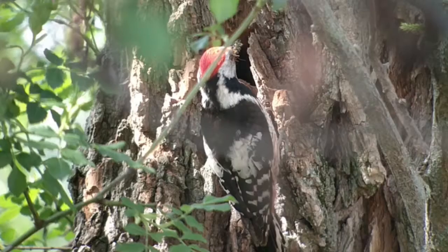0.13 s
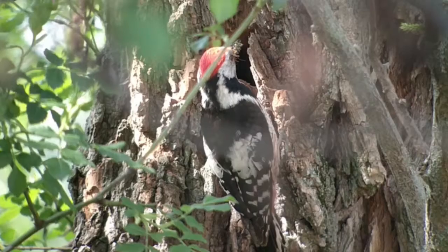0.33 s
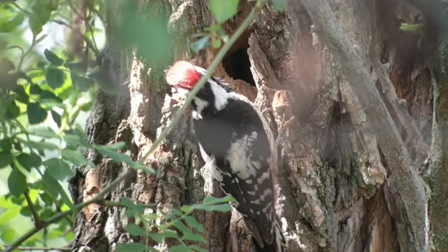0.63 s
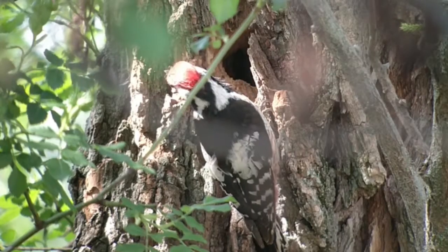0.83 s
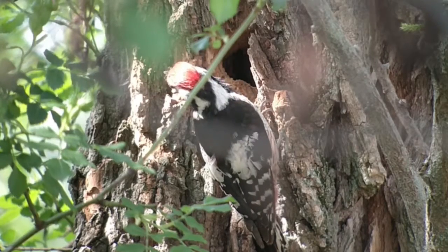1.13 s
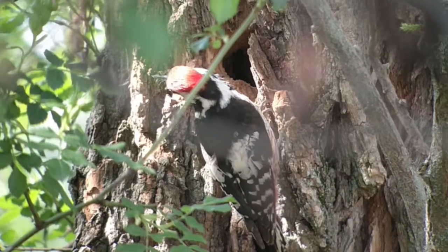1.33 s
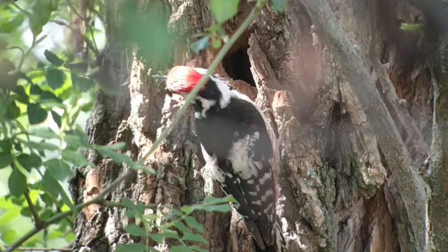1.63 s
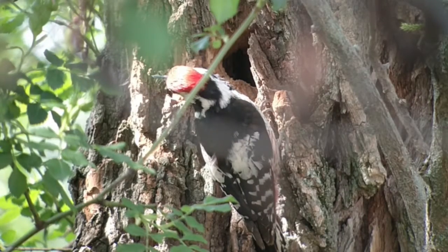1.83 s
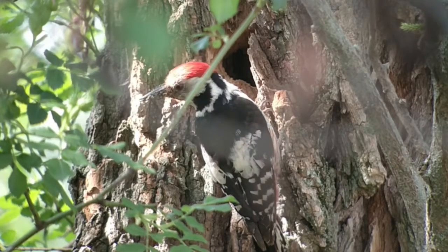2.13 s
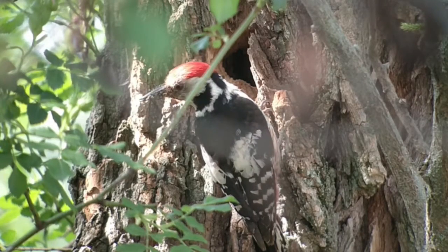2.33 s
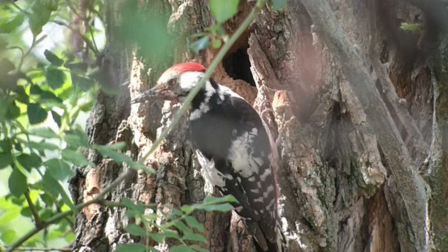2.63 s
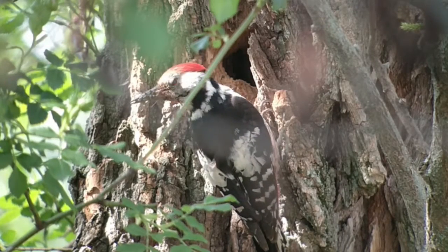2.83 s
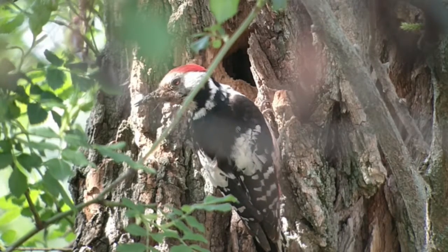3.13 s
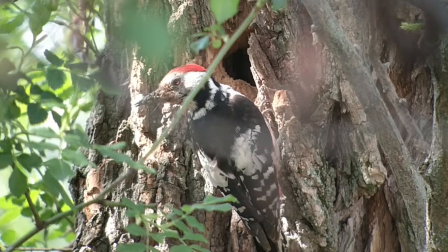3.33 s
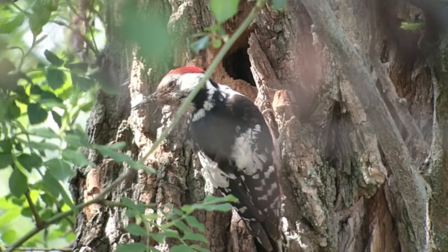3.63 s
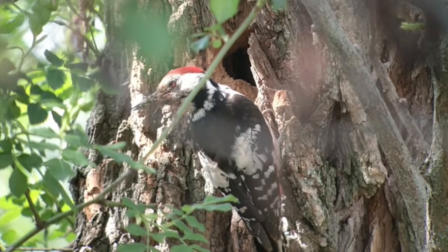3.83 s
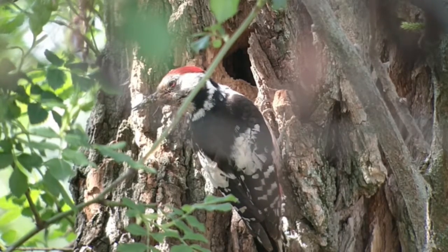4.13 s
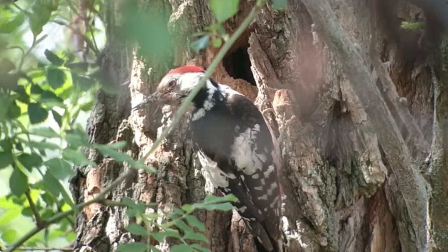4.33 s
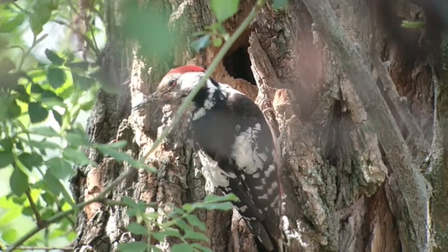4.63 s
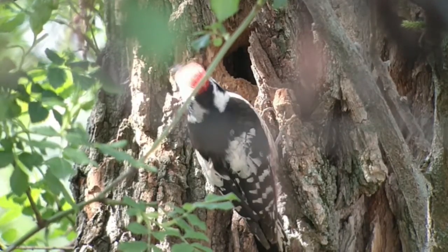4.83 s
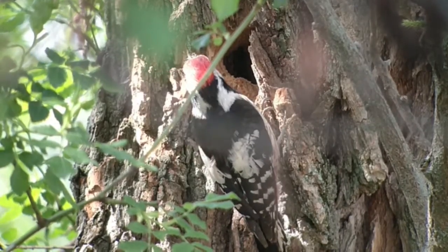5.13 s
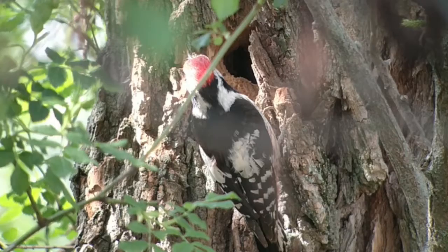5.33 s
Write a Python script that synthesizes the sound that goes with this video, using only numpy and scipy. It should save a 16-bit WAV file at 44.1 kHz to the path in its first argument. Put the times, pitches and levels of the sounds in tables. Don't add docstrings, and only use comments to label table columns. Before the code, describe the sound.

Near silence for the first 0.14 seconds, then a steady forest rush fades in, full by about 0.4: a far low-mid roar with softer, wide leaf hiss, swelling only slightly to the end near 5.5 seconds. From 1.34 a woodpecker close by gives very short, sharp calls of about a tenth of a second, at 1.34, 1.77, 2.23 and 2.67. Each is a clear, slightly nasal whistle-like yelp sweeping quickly upward from roughly 600-800 to 1500 hertz, with bright overtones and a tiny break in the middle. After a pause come three more at 3.93, 4.24 and 4.72; the fifth is clipped and enters abruptly, with the top treble slightly duller from there. Scattered trunk echoes follow each call. Very faint high chirps of distant small birds appear around 1.9, 2.5-2.8, 3.2, 4.1 and 4.35. The rush alone closes the scene.

```python
import sys
import numpy as np
from scipy import signal
from scipy.fft import rfft, irfft, next_fast_len
from scipy.io import wavfile
from scipy.ndimage import uniform_filter1d, minimum_filter1d, map_coordinates

SR = 44100
rng = np.random.default_rng(int(sys.argv[2]) if len(sys.argv) > 2 else 0)


def makeup_ratio(level_db):
    decades = np.asarray(level_db, float) / 20
    return 10 ** decades


def unload_wav(signal):
    wavfile.write(
        sys.argv[1],
        SR,
        np.round(np.clip(np.atleast_2d(signal).T, -1, 1) * 32767).astype(np.int16),
    )


N = 242550
SCENE_CHANGE_S = 3.926

# [t/s, f/Hz]
GLIDES = [
    [(1.340, 830), (1.352, 982), (1.362, 1158), (1.369, 1146), (1.379, 1380), (1.415, 1565), (1.428, 1470)],
    [(1.774, 828), (1.782, 886), (1.8, 1149), (1.808, 1140), (1.815, 1253), (1.838, 1460), (1.862, 1523)],
    [(2.226, 580), (2.233, 623), (2.238, 790), (2.256, 1080), (2.268, 1066), (2.3, 1458), (2.318, 1480)],
    [(2.666, 835), (2.689, 1150), (2.705, 1244), (2.715, 1373), (2.742, 1442), (2.753, 1290)],
    [(3.91, 1300), (3.927, 1335), (3.934, 1247), (3.961, 1337), (3.976, 1383), (3.993, 1270)],
    [(4.237, 515), (4.243, 491), (4.26, 834), (4.268, 994), (4.283, 1087), (4.302, 1327), (4.318, 1393),
     (4.334, 1402), (4.352, 1080)],
    [(4.722, 562), (4.732, 661), (4.737, 821), (4.757, 1157), (4.8, 1376), (4.811, 1357), (4.825, 1184),
     (4.836, 1130)],
]


def unit(x):
    return x / np.sqrt(np.mean(x ** 2) + 1e-20)


def along(points, hz):
    f, v = np.transpose(points)
    return np.interp(np.log(hz + 1), np.log(f + 1), v)


def wobble(rate):
    knots = rng.standard_normal(int(N * rate / SR) + 4)
    return map_coordinates(knots, [np.arange(N) * rate / SR])


def filtered(x, response):
    m = 2 * next_fast_len(N // 2 + SR // 4)
    return irfft(rfft(x, m) * response(np.fft.rfftfreq(m, 1 / SR)), m)[..., :N]


def causal(points, hz):
    cep = irfft(np.log(makeup_ratio(along(points, hz))))
    half = len(cep) // 2
    cep[1:half] *= 2
    cep[half + 1:] = 0
    return np.exp(rfft(cep))


def lead(hz, ms):
    return np.exp(1j * np.pi * hz * ms / 1000 * np.array([[1], [-1]]))


def forest():
    # [t/s, level/dB]
    rush = [(0.4, -31), (0.51, -32), (1.01, -30.5), (1.72, -31), (1.96, -32), (2.4, -30), (2.77, -31),
            (3.68, -29.5), (4.15, -31.5), (4.92, -32.5), (5.09, -32.5), (5.5, -29.5)]
    # [f/Hz, level/dB per Hz]
    air = [(45, -81), (110, -67), (200, -58.5), (350, -54), (600, -57.5), (1000, -59), (2000, -68),
           (4000, -71), (5600, -74.5), (6200, -80), (9500, -83), (11800, -77.5), (13000, -82), (14500, -95)]
    # [f/Hz, likeness 0-1]
    alike = [(60, 0.8), (300, 1), (500, 0.81), (750, 0.54), (1000, 0.88), (1700, 0.25), (2500, 0.45),
             (4000, 0.02)]

    def middle_and_side(hz):
        turn = np.arccos(np.clip(along(alike, hz), -1, 1)) / 2
        return makeup_ratio(along(air, hz)) * [np.cos(turn), np.sin(turn)]

    z = signal.stft(rng.standard_normal((2, N)), nperseg=512)[2]
    field = uniform_filter1d(rng.standard_normal(z.shape[1:]), 6, 0)
    field = uniform_filter1d(field, 14, 1)
    pair = signal.istft(z * makeup_ratio(0.98 * unit(field)), nperseg=512)[1][:, :N]
    mid, side = filtered(pair, middle_and_side)
    both = np.array([mid + side, mid - side])
    both = filtered(both, lambda hz: lead(hz, ms=0.26) * (hz > 30))

    roar = filtered(both, lambda hz: 1 / (1 + (hz / 1200) ** 2))
    leaves = both - roar
    s, wind_db = np.transpose(rush)
    roar_db = np.interp(np.arange(N) / SR, s, wind_db - wind_db.mean())
    leaves_db = 0.81 * roar_db
    gust = wobble(3.7)
    swell = makeup_ratio(roar_db + 0.27 * gust + 0.2 * wobble(10)) * roar + makeup_ratio(leaves_db + 0.54 * gust) * leaves
    return makeup_ratio(-26.5) * swell / np.std(both)


def woodpecker():
    # [f/Hz, level/dB]
    throat = [(500, -50), (750, -36), (920, -25.5), (1080, -6.5), (1230, -9.5), (1340, -12.5), (1550, -22),
              (1850, -21), (2100, -21.5), (2330, -28), (2700, -16.5), (3000, -24.5), (3300, -34),
              (4200, -54)]
    # [bill opens t/s, before/dB, after/dB, reached this much later/s, fading/(dB/s)]
    effort = [(1.375, 2, -1.5, 0.0088, 180), (1.813, 1.2, -4, .012, 150), (2.273, 2.5, -7, 0.018, 120),
              (2.684, -6, 1.5, 0.0091, 150), (3.913, 6, 3.5, 0.021, 254), (4.29, 6, -4, .015, 150),
              (4.747, 1, 5, .027, 330)]
    # [second harmonic at start/dB, halfway/dB, at end/dB, higher harmonics/dB]
    overtones = [(-5.5, -2, 3.5, -9), (-5.5, -4, -7.5, -12.5), (-3, -5.5, -7, -4), (-1.5, -8, -1.5, -13),
                 (1, 0, -8.5, -10.5), (-6, 1, -4, -4), (-1.5, -1, -8, -4)]
    higher_harmonics = [0.3, -4, -12]
    attack_s, release_s, edge_db = 0.012, 0.015, 11.5
    break_db, break_in_s, break_out_s = 6.5, 0.0041, 0.0054
    swell_db_per_s = 152
    overtone_top_db = -13

    voice = np.zeros(N)
    flutter = makeup_ratio(.5 * wobble(150))
    for glide, strength, over in zip(GLIDES, effort, overtones):
        opens_s, before_db, after_db, later_s, fading_db = strength
        *second, higher_db = over
        s, pitch = np.transpose(glide)
        span = np.arange(round(s[0] * SR), round(s[-1] * SR))
        t = span / SR
        hz = uniform_filter1d(np.interp(t, s, pitch), size=88)
        turn = 2 * np.pi * np.cumsum(hz) / SR

        attack = np.clip(1 - (t - s[0]) / attack_s, 0, 1) ** 2
        release = np.clip(1 - (s[-1] - t) / release_s, 0, 1) ** 2
        edges_db = -edge_db * (attack + release)

        since = t - opens_s
        rising_db = before_db + swell_db_per_s * since
        falling_db = after_db - fading_db * np.abs(since - later_s)
        held_db = np.where(since < 0, rising_db, falling_db)
        break_s = np.where(since < 0, break_in_s, break_out_s)
        dip_db = -break_db * np.exp(-(since / break_s) ** 2)
        first_db = uniform_filter1d(held_db, size=130) + dip_db
        second_db = np.interp(t, np.linspace(s[0], s[-1], len(second)), second)

        levels = [first_db, second_db] + [higher_db + db for db in higher_harmonics]
        for k, db in enumerate(levels, start=1):
            throat_db = np.minimum(along(throat, k * hz), overtone_top_db if k > 1 else 0)
            voice[span] += makeup_ratio(3.5 + edges_db + db + throat_db) * np.sin(k * turn)

    cut = slice(round(GLIDES[4][0][0] * SR), round(GLIDES[4][-1][0] * SR))
    voice[cut] *= np.clip((np.arange(N)[cut] / SR - SCENE_CHANGE_S) / .0035, 0, 1) ** 2
    return voice * flutter


def trunks(x):
    # [f/Hz, t60/s]
    ringing = [(800, 0.71), (1500, 0.19), (2800, 0.73), (6000, 0.33)]
    # [delay t/s, left level/dB, right level/dB]
    near = [
        (.03, -21, -22),
        (.058, -8, -7.5),
        (.078, -14, -23),
        (.095, -9.5, -10.5),
        (0.131, -23, -19),
    ]
    wet = np.zeros((2, N))
    step = SR // 5
    for start in range(0, N, step):
        hz, t, z = signal.stft(rng.standard_normal((2, SR // 2)), SR, nperseg=256)
        decay = makeup_ratio(-60 * t / along(ringing, hz)[:, None])
        tail = signal.istft(z * decay, SR, nperseg=256)[1]
        tail = np.pad(tail / np.linalg.norm(tail[0]), ((0, 0), (400, 0)))
        for delay, *db in near:
            at = round((delay + rng.normal(0, .001)) * SR)
            tail[:, at] += makeup_ratio(np.add(db, rng.normal(0, 1)))
        part = signal.fftconvolve(x[:, start:start + step], tail, axes=1)
        wet[:, start:start + part.shape[1]] += part[:, :N - start]
    return wet


def songbirds():
    # [t/s, length/s, start f/Hz, end f/Hz, level/dB]
    chirps = [(1.855, 0.053, 4100, 4200, -49.5), (2.53, 0.023, 5200, 5850, -46),
              (2.554, .022, 4730, 4300, -51), (2.575, 0.023, 3800, 4070, -48),
              (2.763, 0.037, 4100, 4210, -50), (3.15, 0.08, 7600, 7450, -60.5),
              (3.21, .03, 7400, 7200, -65), (3.24, .03, 7400, 7700, -64), (3.275, .04, 7640, 7250, -66),
              (4.07, 0.025, 5370, 5750, -53), (4.093, 0.027, 4730, 4450, -52),
              (4.11, 0.033, 3870, 3920, -50), (4.343, 0.048, 4150, 4210, -52)]
    burr_hz, pan_db = 130, -3
    sides_db = np.array([[pan_db / 2], [-pan_db / 2]])
    song = np.zeros((2, N))
    for s, length, from_hz, to_hz, db in chirps:
        u = np.linspace(0, 1, round(length * SR))
        swell = np.sin(np.pi * u) * (0.95 + 0.36 * wobble(330)[:len(u)])
        hz = from_hz + (to_hz - from_hz) * u + burr_hz * wobble(220)[:len(u)]
        note = swell * np.sin(2 * np.pi * np.cumsum(hz) / SR)
        song[:, round(s * SR):][:, :len(u)] += makeup_ratio(db + 14.0 + sides_db) * note
    return song


def scene():
    # [left-right/dB, echo/dB]
    facing = [(-3.5, -1), (-2.5, 2.5), (-1.5, 3.5), (-1.5, 3), (-0.5, -1.5), (-3, -2.5), (-7, -3.5)]
    # [f/Hz, level/dB]
    aside_colour = [(700, -17), (1100, -17.5), (1500, -14.5), (1900, -14), (2300, 1.5), (2700, -8),
                    (3100, -3.5), (4200, -23.5)]
    rush = forest()
    call = woodpecker()
    call_ends = [glide[-1][0] for glide in GLIDES[:-1]]
    which = np.searchsorted(call_ends, np.arange(N) / SR)
    pan_db, echo_db = np.array(facing)[which].T
    bird = filtered(call, lambda hz: lead(hz, ms=0.065)) * [makeup_ratio(pan_db), np.ones(N)]
    aside = filtered(call * makeup_ratio(echo_db), lambda hz: causal(aside_colour, hz))
    far = songbirds()
    return bird + far + trunks(aside + makeup_ratio(-9.0) * far) + rush


def limited(x, top):
    need = np.minimum(1, top / (np.abs(x).max(axis=0) + 1e-9))
    return x * uniform_filter1d(minimum_filter1d(need, size=220), size=160)


def sieved(x):
    # [f/Hz, left level/dB, right level/dB]
    sieve = [(2500, -9, -14), (5000, -6, -7), (5500, 3, -5), (6100, -1, .5), (7000, -3, -2.5),
             (7900, 8, -2.5), (8500, 0, -1.5), (10000, .5, -1), (11500, -1, -4), (13000, 0, 0),
             (14500, 1, 3), (15200, 3, 9)]
    hz, t, z = signal.stft(x, SR, nperseg=2048)
    power = uniform_filter1d(np.abs(z) ** 2, size=5, axis=1)
    power = uniform_filter1d(power, size=2, axis=2)
    drift = uniform_filter1d(power[:, hz > 6000].sum(axis=1, keepdims=True), size=9, axis=2)
    usual = np.median(power / drift, axis=2, keepdims=True)
    usual = drift * uniform_filter1d(usual, size=15, axis=1)
    edge, *bars = np.transpose(sieve)
    bar_db = np.array([np.interp(hz, edge, bar, left=-60) for bar in bars])[..., None]
    block = power.sum(axis=(0, 1))
    over_db = 10 * np.log10(np.maximum(block / np.median(block), 1))
    greed = np.where(t < SCENE_CHANGE_S, .05, .3)
    loud_db = greed * over_db * (hz[:, None] > 12800)
    keep = power > usual * makeup_ratio(2 * (bar_db + loud_db))
    return signal.istft(z * keep, SR, nperseg=2048)[1][:, :N]


def band_limit(x):
    return signal.sosfilt(signal.butter(12, 15640, fs=SR, output="sos"), x)


def record(dry):
    # [f/Hz, level/dB]
    left_colour = [(600, -2.5), (1000, -0.5), (1400, 1), (1700, 16), (2000, 4.5), (2700, -11.5), (3800, -13.5),
                   (4600, 6.5), (5500, -24), (6900, 0.2), (7800, -5), (10000, -8), (12000, -13.5), (15000, -1)]
    # [t/s, level/dB]
    fade = [(.135, -53), (.145, -20), (.18, -10), (.26, -6), (.34, -1.5), (.42, 0)]
    x = np.array([filtered(dry[0], lambda hz: causal(left_colour, hz)), dry[1]])
    x = sieved(limited(x, top=.85))
    t = np.arange(N) / SR
    duller = filtered(x, lambda hz: 1 / (1 + (hz / 14300) ** 60))
    x = np.where(t < SCENE_CHANGE_S, x, duller)
    x = x * makeup_ratio(np.interp(t, *np.transpose(fade))) * (t > fade[0][0])
    return band_limit(x)


dry = scene()
out = record(dry)
unload_wav(out)
```